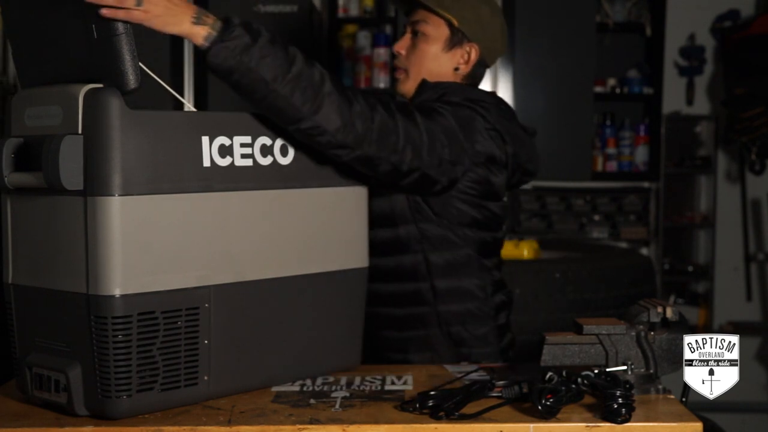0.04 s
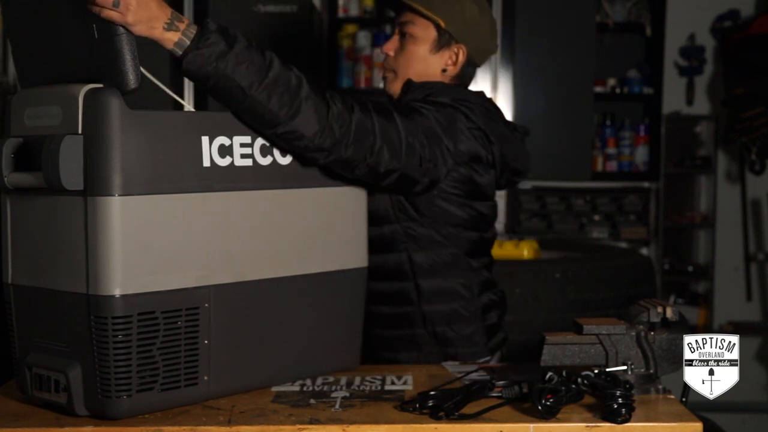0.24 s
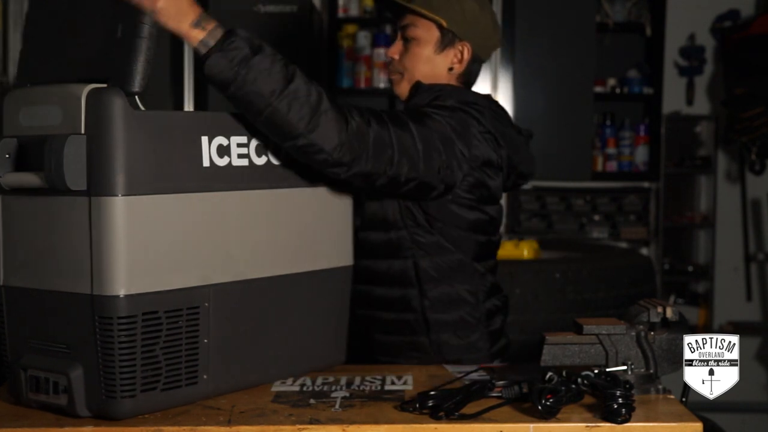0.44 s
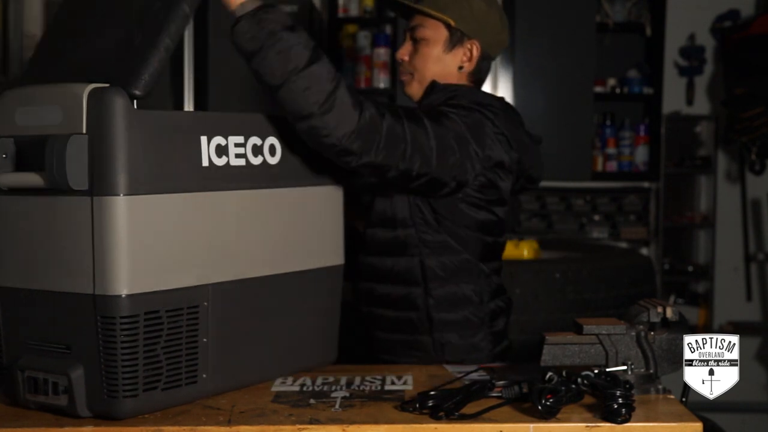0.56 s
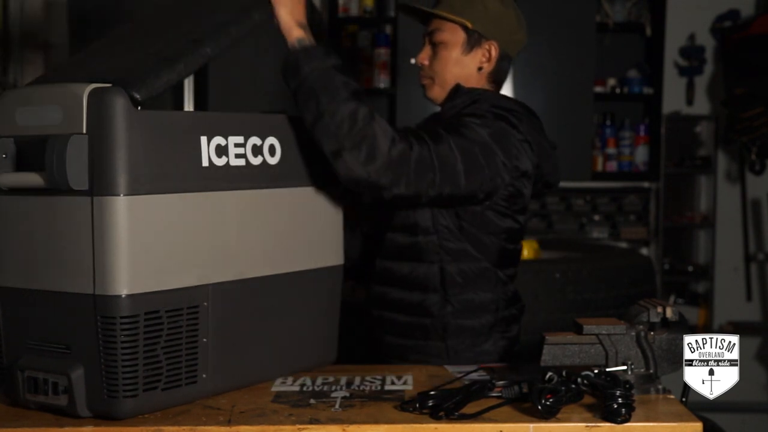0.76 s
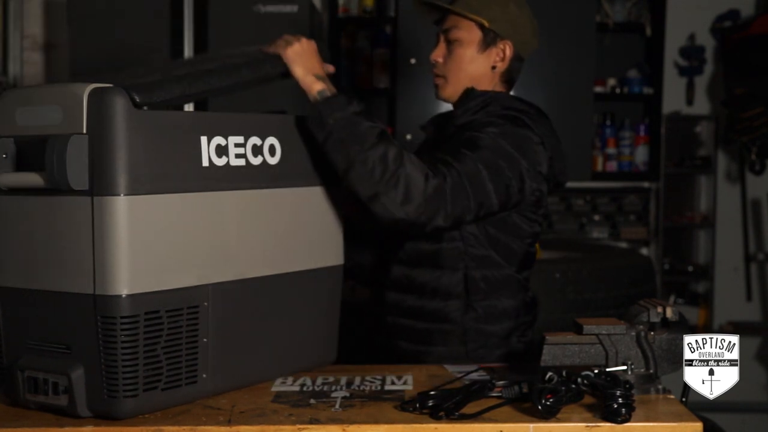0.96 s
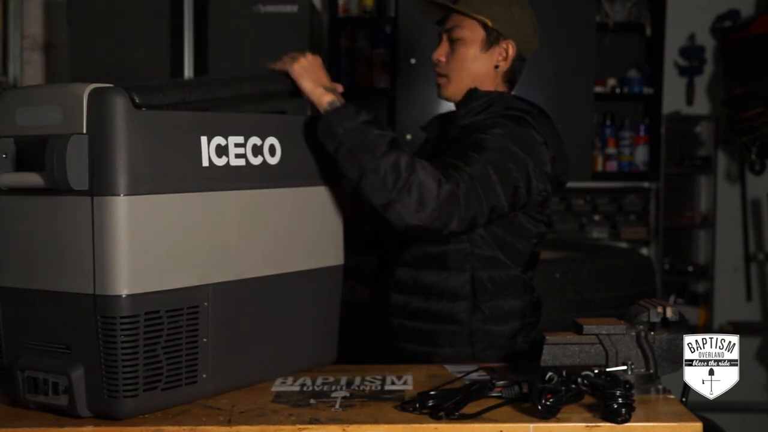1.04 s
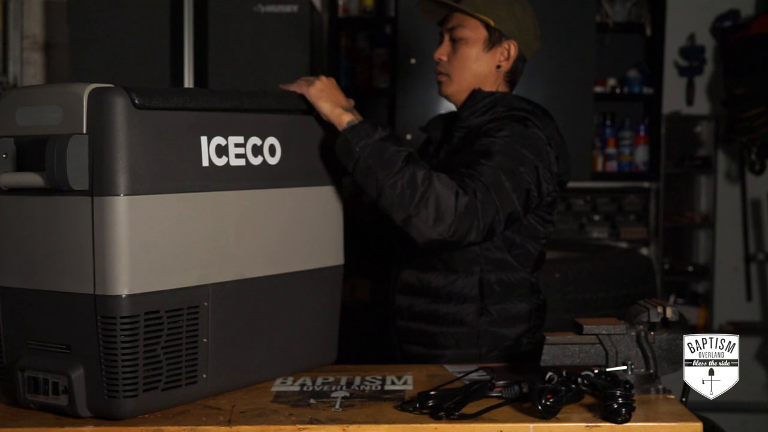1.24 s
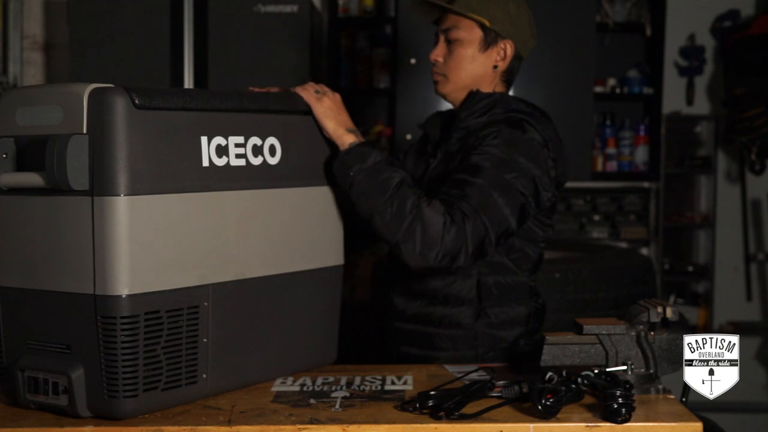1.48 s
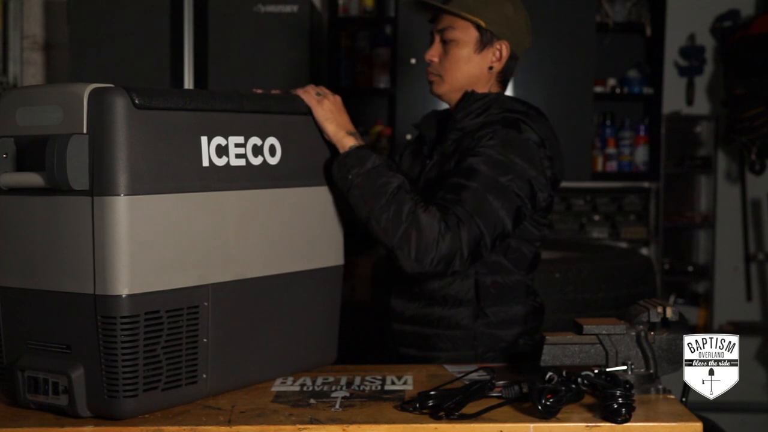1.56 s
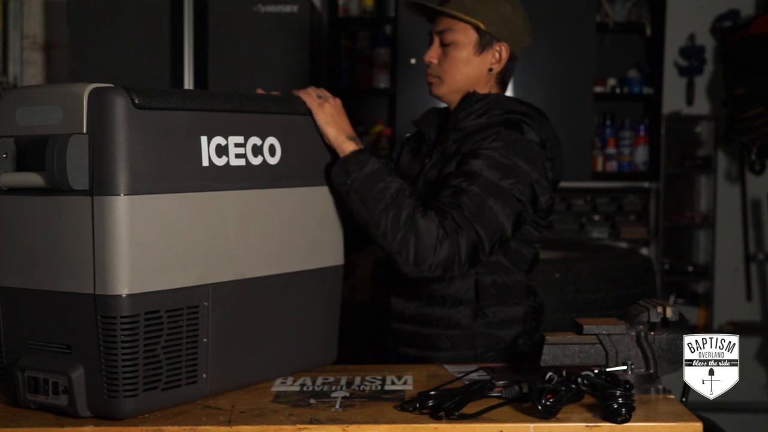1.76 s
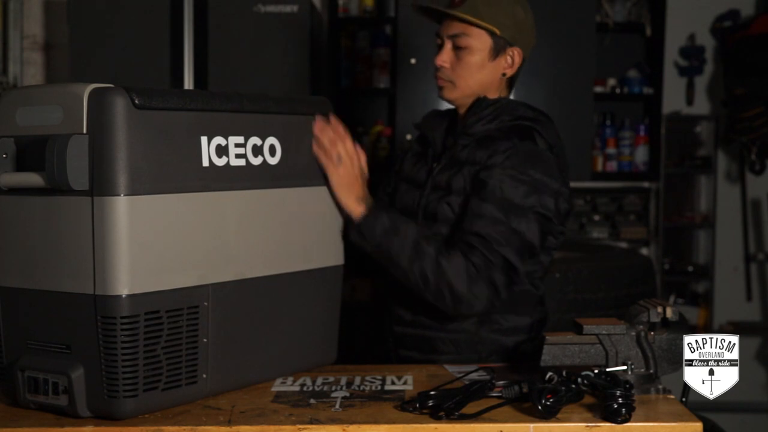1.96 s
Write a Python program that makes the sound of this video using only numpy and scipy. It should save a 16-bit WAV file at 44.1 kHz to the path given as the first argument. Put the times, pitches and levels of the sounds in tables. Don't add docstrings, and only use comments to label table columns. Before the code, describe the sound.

A portable fridge lid is shut: brief latch rattle, soft jacket rustle during the swing, a hollow boxy slam, then a brighter latch slap, both ringing in a garage, picked up by one fairly close microphone.

```python
import sys
import numpy as np
from scipy import signal
from scipy.io import wavfile

SR = 44100
rng = np.random.default_rng(int(sys.argv[2]) if len(sys.argv) > 2 else 0)


def undo_db(level):
    steps = np.asarray(level, float) / 20
    return 10 ** steps


def wrap_up_sound(samples):
    columns = np.atleast_2d(samples).T
    tamed = np.clip(columns, -1, 1)
    steps = np.round(tamed * 32767).astype(np.int16)
    wavfile.write(sys.argv[1], SR, steps)


N = 88861

# (time [s], level [dB], swell [s], hold [s], extra fade [dB/s^2])
BANGS = [
    (1.1405, -21.5, 0.057, 0.11, 57),
    (1.651, -19, 0.051, 0.0022, 128),
]
# (early treble loss [dB/s/kHz], lag of lows [cycles], tail length [factor], box level [dB])
BUILD_UPS = [
    (23.1, 3.7, 0.67, -29),
    (10, 1.8, 1.205, -30.5),
]
# (frequency [Hz], density [dB/Hz])
LID_COLOUR = [(29, -48.5), (50, -31), (108, -5.5), (174, -14.5), (317, -5.5), (2440, -13.5), (3500, -7),
              (9360, -20), (15500, -15.5)]
LATCH_COLOUR = [(29, -63), (50, -56), (501, -5.5), (622, -3.5), (957, -14.5), (1370, -14), (2380, -6),
                (6690, -2.5), (15500, -14.5)]
# (frequency [Hz], t60 [s])
GARAGE_T60 = [(60, 0.75), (250, 0.49), (1000, 0.36), (4000, 0.48), (8000, 0.39), (15000, 0.25)]
# (frequency [Hz], level [dB], t60 [s])
LID_MODES = [(233, -3, 0.38), (320, -5.5, 0.59), (1240, -7, 0.51), (542, -40.5, 0.19), (581, -3.5, 0.9),
             (645, -5, 0.13), (764, -0.5, 0.56), (833, -10, 0.78), (1062, -11, 0.64)]
LATCH_MODES = [(305, -7.5, 0.38), (653, -7.5, 0.23), (738, -8, 0.46), (1019, 0.5, 0.55), (1177, 0, 0.45),
               (1263, -7.5, 0.45), (1367, -1, 0.56), (1450, -4, 0.59)]
# (time [s], peak [dB], pitch [factor])
LATCH_SLIPS = [(.0902, -25, 1), (.0935, -28, 1), (.0992, -28, 1), (.1008, -31, 1), (.1025, -32, 1),
               (.1052, -23, 1), (.1078, -25, 1), (.112, -19, 1), (.1148, -25, 1), (.1172, -33, 1),
               (.1203, -26, 1), (.122, -30, 1), (.1243, -32, 1.05), (.1305, -34, 1.05), (.1365, -30, 1.1),
               (.1422, -28, 1.15), (.1593, -36, 1.15), (.166, -39, 1.15), (.176, -37, 1.17),
               (.1819, -29, 1.17), (.1845, -35, 1.17), (.188, -38, 1.17), (.195, -42, 1.1)]
# (frequency [Hz], level [dB], t60 [s])
PLASTIC_MODES = [(2083, -2.5, 0.031), (2470, -5.5, 0.015), (3220, 6, 0.013), (3880, 6, 0.012),
                 (4870, -9, 0.0056), (5340, 6.5, 0.0053), (6250, -12.5, 0.033), (7300, -9, 0.014),
                 (8900, -10.5, 0.0092), (11030, -3.5, .008)]
# (time [s], level [dB], frequency [Hz], t60 [s], broad crack level [dB])
TICKS = [ (.049, -44, 7700, .01, -62), (.049, -37, 10100, 0.011, -80), (.0717, -36, 3240, 0.016, -72),
         (.083, -36, 7130, 0.015, -60), (.083, -52, 9300, .01, -80), (.7018, -27.5, 2660, 0.0095, -25),
         (.7022, -20, 3470, 0.0041, -80), (.7022, -29, 5300, 0.0066, -81), (1.03, -47.5, 1950, 0.0075, -57),
         (1.184, -5, 3690, 0.0072, 0), (1.218, -45, 4070, 0.0099, -17), (1.232, -27, 5010, 0.054, -12.5),
         (1.5, -50.5, 11870, 0.017, -75), (1.501, -49, 3430, 0.015, -60), (1.51, -46, 5100, 0.03, -53),
         (1.511, -45, 3490, 0.03, -46), (1.518, -49.5, 5000, .03, -44), (1.518, -63, 6540, 0.028, -80),
         (1.518, -47, 9900, 0.0082, -57), (1.518, -43.5, 3720, 0.021, -61), (1.5796, -49, 3750, 0.011, -56),
         (1.599, -30, 3230, 0.014, -50), (1.599, -35.5, 4460, 0.013, -80), (1.598, -40, 5200, 0.011, -74),
         (1.617, -61, 3080, 0.017, -55), (1.6315, -30, 3100, 0.015, -46), (1.6325, -28, 4470, 0.0094, -43),
         (1.6315, -40, 6200, 0.013, -59), (1.637, -32, 4150, 0.0066, -43)]
# (time [s], level [dB], frequency [Hz], t60 [s])
BUMPS = [(0.084, -49.5, 427, 0.36), (0.111, -42.5, 498.5, 0.28), (0.132, -35.5, 359, 0.067),
         (0.17, -42, 321.4, 0.28), (.206, -35.5, 151, 0.15), (.232, -41, 155, 0.12),
         (0.239, -45, 563, 0.073), (0.249, -47, 320, 0.096), (0.326, -58, 483, 0.035),
         (.45, -63, 150, 0.22), (0.516, -46.5, 123.7, 0.11), (0.52, -39.5, 255, 0.041),
         (.527, -48.5, 424, 0.091), (.537, -47, 296, 0.063), (0.563, -48.5, 144, 0.068),
         (0.7061, -44.5, 500, 0.033), (1.108, -60.5, 131.4, 0.53), (1.152, -34, 670, 0.11),
         (1.164, -36, 762, 0.069), (1.176, -29, 285.3, 0.22), (1.186, -22, 97.6, 0.42),
         (1.236, -29.5, 328.4, 0.23), (1.502, -37, 102, 0.098), (1.51, -48.5, 294, 0.19),
         (1.6, -50.5, 690, 0.36), (1.611, -39.5, 304, 0.094), (1.628, -31.5, 134, 0.049),
         (1.632, -34, 432, 0.13), (1.688, -32, 626, 0.15), (1.716, -33.5, 1017, 0.15)]
# (start [s], fullest [s], end [s], level [dB])
STROKES = [
    (.02, .105, 0.12, -53.5),
    (-.1, 0.025, .1, -58.5),
    (0.153, 0.19, 0.26, -72),
    (0.456, 0.532, 0.59, -48.5),
    (0.503, 0.632, 0.807, -43),
    (0.95, 1, 0.72, -73),
]
# (frequency [Hz], density [dB/Hz])
SLEEVE_COLOUR = [(710, -62.5), (1200, -19), (1970, -29), (2470, -0.5), (3100, -0.5), (4720, -3), (8730, 1),
                 (11800, -0.5), (15800, -11)]
# (start [s], # fullest [s], end [s], level [dB], frequency [Hz])
WEAVES = [(-.06, .07, .2, -56, 3600), (1.21, 1.28, 1.36, -52, 8900), (.52, .64, .78, -50, 9000),
          (.55, .64, .74, -54, 3000), (.96, 1.01, 1.07, -63, 4100), (.97, 1.01, 1.04, -70, 11800),
          (.82, .86, .9, -72, 9800), (1.42, 1.53, 1.62, -66, 1350), (1.6, 1.635, 1.66, -58, 3200),
          (1.6, 1.64, 1.66, -59, 4700), (1.3, 1.37, 1.46, -56, 2600), (1.65, 1.69, 1.8, -34, 3200)]
# (start [s], fullest [s], end [s], level [dB], frequency [Hz])
STREAKS = [(-.1, .03, .1, -61, 10300), (-.1, .02, .06, -67, 7400), (.05, .085, .13, -62, 7400),
           (0, .04, .08, -70, 11300), (.17, .19, .23, -59, 7200), (.18, .197, .23, -62, 5700),
           (.17, .19, .24, -64, 2500), (.17, .195, .24, -64, 4000), (.36, .46, .5, -72, 580),
           (.56, .6, .65, -70, 600), (.57, .62, .7, -73, 790), (1.87, 1.915, 1.95, -61, 11800),
           (1.9, 1.94, 1.99, -56, 10800), (1.89, 1.925, 1.95, -59, 9500), (1.94, 1.978, 1.99, -60, 9300)]
# (start [s], fullest [s], end [s], level [dB], frequency [Hz])
LAST_STROKE = [
    (1.86, 1.945, 1.993, -56, 11200),
]
# (frequency [Hz], density [dB/Hz])
FLOOR_COLOUR = [(18, -60), (30, -61), (100, -13.5), (447, -8), (581, -9.5), (1090, -15.5), (2730, -14),
                (9600, -24.5), (15800, -58)]

DUCK_DB, BANG_RISE_S, BOX_MODE_T60_S = -20.5, 0.00099, 0.045
SLIP_FADE_S, SLIP_RISE_S, LATCH_TOP_HZ = 0.0011, 0.0003, 8500
CRACK_T60_S, CRACK_LOW_HZ, CRACK_TOP_HZ = 0.011, 1500, 11200
PUSH_CYCLES, RUMBLE_FULL_HZ = 1.08, 600
TICK_WOBBLE, BUMP_WOBBLE, WOBBLE_RATE_SHARE = 0.033, 0.045, 0.25
WEAVE_WIDTH, STREAK_WIDTH = 0.1, 0.05
FLOOR_DB, HUM_HZ, HUM_DB = -67.5, 144.3, -77.5
MIC_CUT_HZ, TOP_CUT_HZ = 84, 16200


def bang(event, build_up, colour, modes):
    start_s, level_db, swell_s, hold_s, fade = event
    loss_db, lag_cycles, tail_factor, box_db = build_up
    t = np.arange(N) / SR - start_s
    early = np.clip(t, 0, swell_s + hold_s)
    late = np.maximum(t - swell_s - hold_s, 0)
    duck_db = DUCK_DB * np.clip(1 - t / swell_s, 0, 1) ** 2.43
    gain = (t > 0) * undo_db(duck_db - fade * late ** 2) * np.clip(t / BANG_RISE_S, 0, 1)

    room = np.zeros(N)
    for hz, noise in bands(colour, patchy_db=1.0):
        build = np.clip(t * hz / lag_cycles, 0, 1) ** 2
        decay_db = -60 * late / (tail_factor * at_hz(GARAGE_T60, hz))
        room += noise * build * undo_db(decay_db - loss_db * early * hz / 1000)

    box = np.zeros(N)
    for hz, mode_db, t60 in modes:
        build = np.clip(t * hz / lag_cycles, 0, 1) ** 2
        tone = rms_one(ring(rng.standard_normal(N), hz, BOX_MODE_T60_S))
        box += tone * build * undo_db(mode_db - 60 * np.maximum(t - swell_s, 0) / t60)
    return gain * (undo_db(level_db) * room + undo_db(box_db) * box)


def rattle():
    out, t = np.zeros(N), np.arange(1500) / SR
    dull = signal.butter(2, LATCH_TOP_HZ, fs=SR, output="sos")
    envelope = np.exp(-t / SLIP_FADE_S) - np.exp(-t / SLIP_RISE_S)
    for start_s, peak_db, pitch in LATCH_SLIPS:
        scrapes = np.diff(envelope * rng.standard_normal((len(PLASTIC_MODES), len(t))), prepend=0)
        luck_db = rng.normal(0, 2.5, len(PLASTIC_MODES))
        slip = np.zeros(len(t))
        for scrape, own_db, (hz, mode_db, t60) in zip(scrapes, luck_db, PLASTIC_MODES):
            slip += undo_db(mode_db + own_db) / hz * ring(scrape, hz * pitch, t60)
        slip = signal.sosfilt(dull, slip)
        i = int(start_s * SR)
        out[i:i + len(t)] += undo_db(peak_db) * slip / np.abs(slip).max()
    return out


def ticks():
    out, t = np.zeros(N + 8000), np.arange(8000) / SR
    crack_band = signal.butter(2, [CRACK_LOW_HZ, CRACK_TOP_HZ], "band", fs=SR, output="sos")
    rise = 1 - np.exp(-t / 0.0006)
    for start_s, level_db, hz, t60, crack_db in TICKS:
        burst = rng.standard_normal(len(t)) * undo_db(crack_db - 7.5 - 60 * t / CRACK_T60_S)
        crack = signal.sosfilt(crack_band, burst)
        tone = undo_db(level_db - 60 * t / t60) * wobbly(t, hz, TICK_WOBBLE)
        i = int(start_s * SR)
        out[i:i + len(t)] += (tone + crack) * rise
    return out[:N]


def bumps():
    out, t = np.zeros(N + 24000), np.arange(24000) / SR
    for start_s, level_db, hz, t60 in BUMPS:
        push_s = PUSH_CYCLES / hz
        rise = np.sin(np.pi / 2 * np.clip(t / push_s, 0, 1)) ** 2
        shape = rise * undo_db(level_db - 60 * np.maximum(t - push_s, 0) / t60)
        rumble = band_noise(len(t), hz / 2.08, hz * 1.27)
        rumble_gain = min(hz / RUMBLE_FULL_HZ, 0.8) ** 2
        i = int(start_s * SR)
        out[i:i + len(t)] += shape * (wobbly(t, hz, BUMP_WOBBLE) + rumble_gain * rms_one(rumble))
    return out[:N]


def sleeve():
    hiss = sum(noise for _, noise in bands(SLEEVE_COLOUR, patchy_db=2.0))
    rubs = hiss * sum(stroke(*row) for row in STROKES)
    rubs = rubs + narrow(WEAVES, WEAVE_WIDTH) + narrow(STREAKS, STREAK_WIDTH)
    *row, hz = LAST_STROKE[0]
    slide = rms_one(band_noise(N, hz / 1.2, hz * 1.13))
    return rubs + stroke(*row) * slide * undo_db(2 * drift(40))


def garage_floor():
    hum = rms_one(ring(rng.standard_normal(N), HUM_HZ, 0.2))
    hiss = sum(noise for _, noise in bands(FLOOR_COLOUR, patchy_db=2.5))
    return undo_db(FLOOR_DB) * hiss + undo_db(HUM_DB) * hum


def small_room(x, wet_db, t60):
    t = np.arange(SR // 2) / SR
    tail = rng.standard_normal(len(t)) * undo_db(-60 * t / t60) * np.clip(t / 0.006, 0, 1)
    tail /= np.sqrt(np.sum(tail ** 2))
    return x + undo_db(wet_db) * signal.fftconvolve(x, tail)[:N]


def stroke(start_s, full_s, end_s, level_db):
    ramp = np.interp(np.arange(N) / SR, [start_s, full_s, end_s], [0, 1, 0])
    return undo_db(level_db) * np.sin(np.pi / 2 * ramp) ** 2


def narrow(rows, width):
    out = np.zeros(N)
    for *row, hz in rows:
        once = ring(rng.standard_normal(N), hz, 2 / (width * hz))
        out += stroke(*row) * rms_one(ring(once, hz, 1 / (width * hz)))
    return out


def bands(spectrum, patchy_db):
    edges_hz = 32 * 2 ** np.arange(0, 9.1, 1 / 3)
    white = rng.standard_normal((2, N))
    out = []
    for k, (low, high) in enumerate(zip(edges_hz, edges_hz[1:])):
        hz = np.sqrt(low * high)
        part = signal.sosfilt(signal.butter(2, [low, high], "band", fs=SR, output="sos"), white[k % 2])
        inside = spectrum[0][0] < hz * 1.1
        out.append((hz, inside * part * undo_db(at_hz(spectrum, hz) + patchy_db * drift(14))))
    total = np.std(sum(part for _, part in out))
    return [(hz, part / total) for hz, part in out]


def band_noise(n, low_hz, high_hz):
    sos = signal.butter(2, [low_hz, high_hz], "band", fs=SR, output="sos")
    return signal.sosfilt(sos, rng.standard_normal(n))


def ring(x, hz, t60):
    r, w = undo_db(-60 / (t60 * SR)), 2 * np.pi * hz / SR
    return signal.lfilter([0, np.sin(w)], [1, -2 * r * np.cos(w), r * r], x + 1e-18)


def wobbly(t, hz, share):
    r = np.exp(-2 * np.pi * WOBBLE_RATE_SHARE * hz / SR)
    wander = rms_one(signal.lfilter([1], [1, -2 * r, r * r], rng.standard_normal(len(t))))
    return np.sin(2 * np.pi * hz * np.cumsum(1 + share * wander) / SR)


def drift(rate_hz):
    r = np.exp(-80 * np.pi * rate_hz / SR)
    slow = signal.lfilter([1], [1, -2 * r, r * r], rng.standard_normal(N // 40 + 2002))[2000:]
    return np.interp(np.arange(N) / 40, np.arange(len(slow)), rms_one(slow))


def at_hz(points, hz):
    points = np.array(points)
    return np.interp(np.log(hz), np.log(points[:, 0]), points[:, 1])


def rms_one(x):
    return x / np.sqrt(np.mean(x ** 2) + 1e-20)


def scene():
    lid = bang(BANGS[0], BUILD_UPS[0], LID_COLOUR, LID_MODES)
    latch = bang(BANGS[1], BUILD_UPS[1], LATCH_COLOUR, LATCH_MODES)
    small = small_room(rattle() + ticks() + bumps(), wet_db=-12, t60=0.2)
    return (lid + latch + small + sleeve() + garage_floor())[None]


def band_limit(x):
    return signal.sosfilt(signal.butter(12, 16270, fs=SR, output="sos"), x)


def record(dry):
    x = signal.sosfilt(signal.butter(3, MIC_CUT_HZ, "high", fs=SR, output="sos"), dry)
    x = signal.sosfilt(signal.cheby2(12, 70, TOP_CUT_HZ, fs=SR, output="sos"), x)
    return band_limit(x)


dry = scene()
out = record(dry)
wrap_up_sound(out)
```